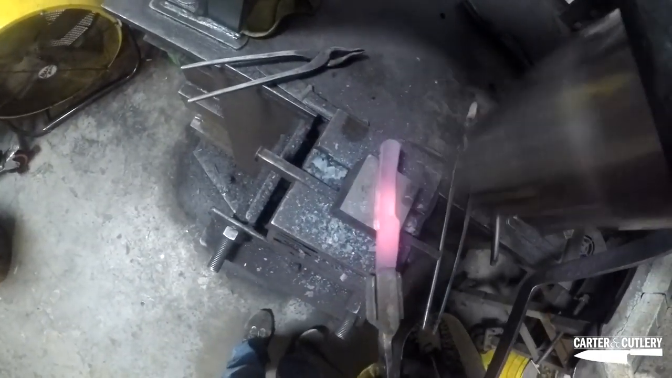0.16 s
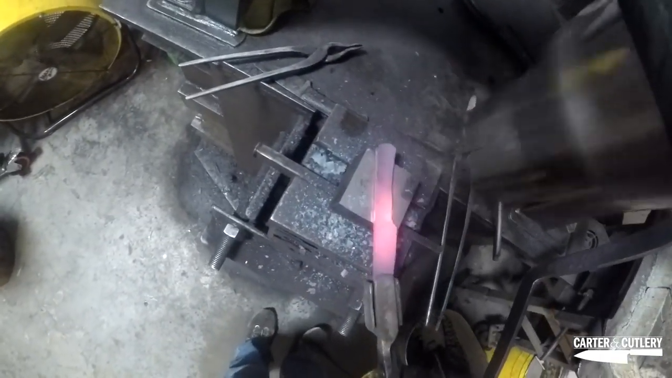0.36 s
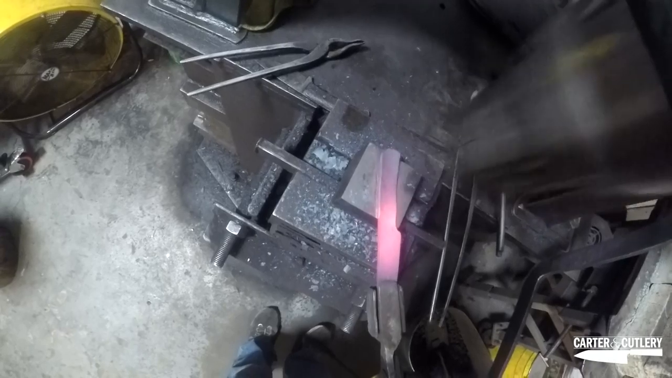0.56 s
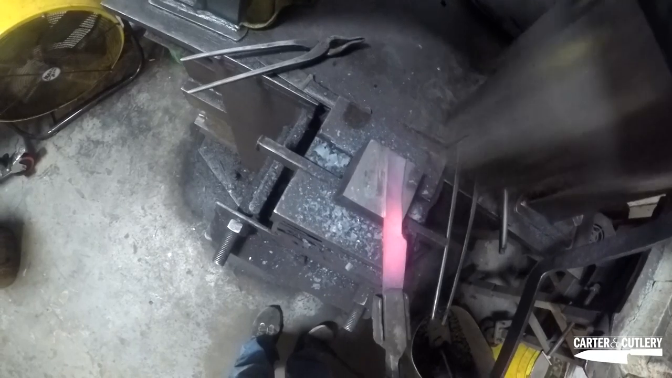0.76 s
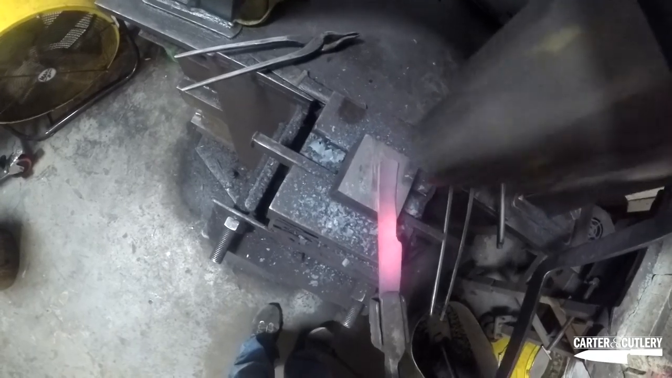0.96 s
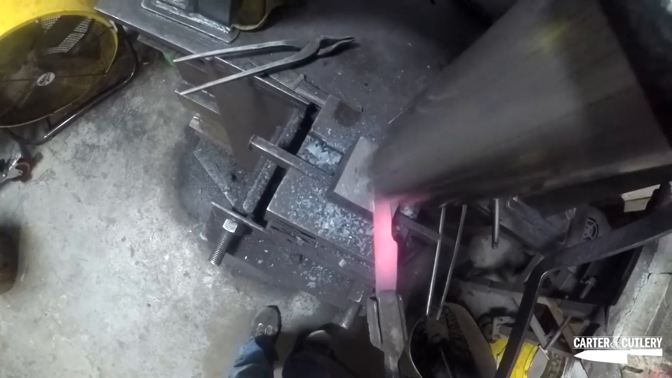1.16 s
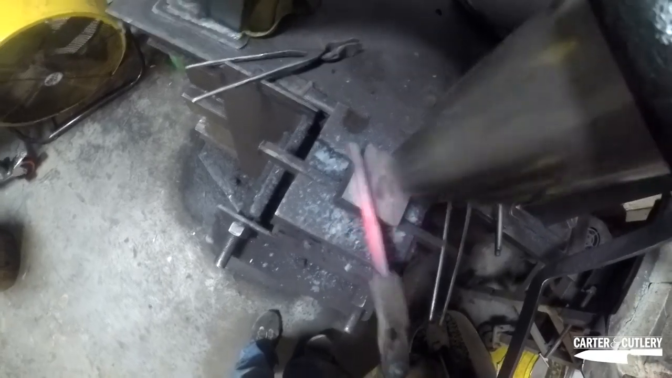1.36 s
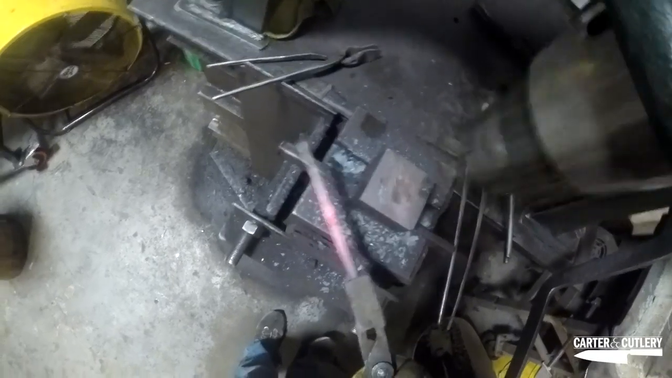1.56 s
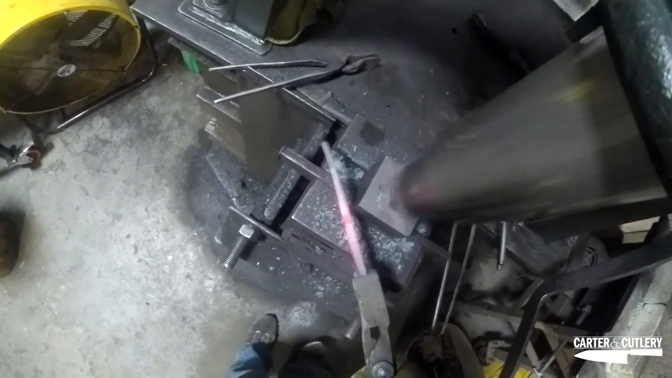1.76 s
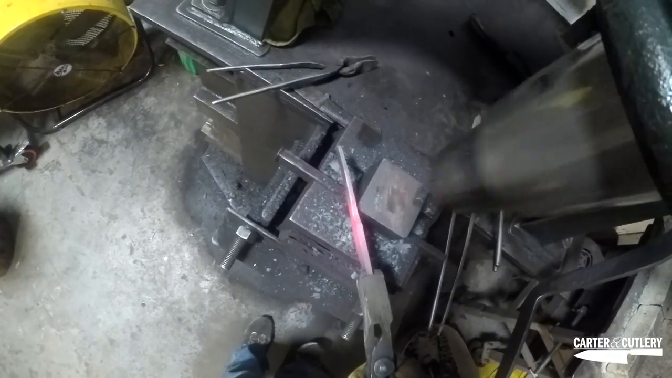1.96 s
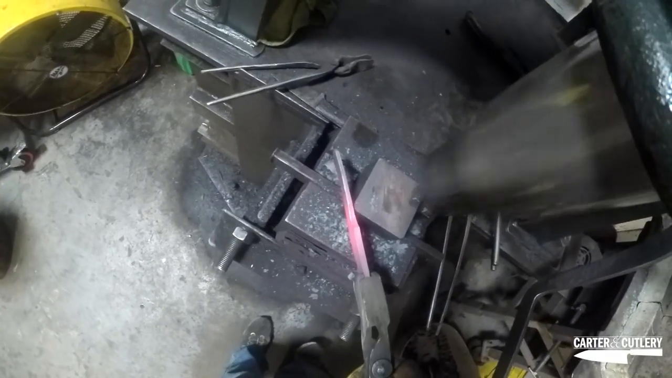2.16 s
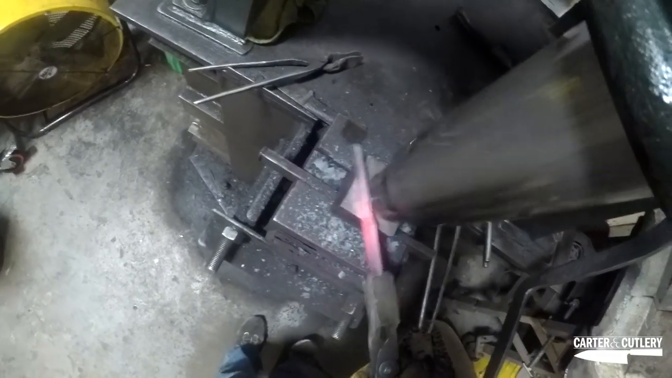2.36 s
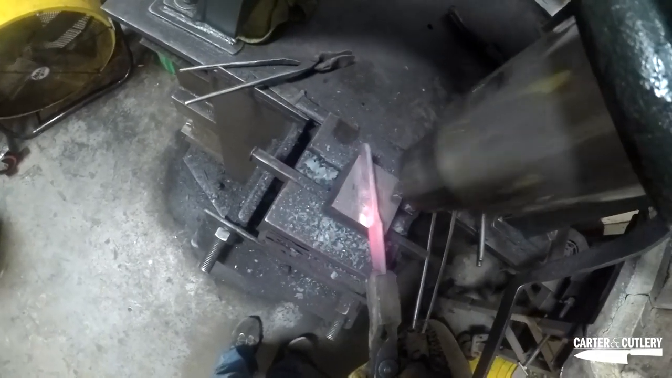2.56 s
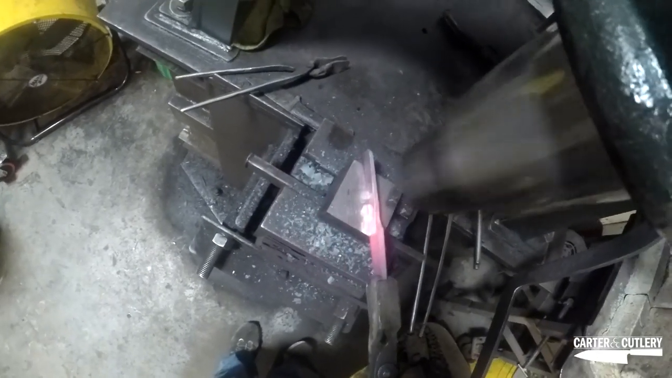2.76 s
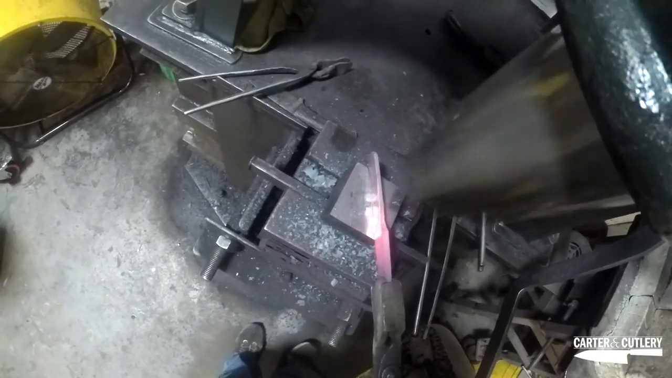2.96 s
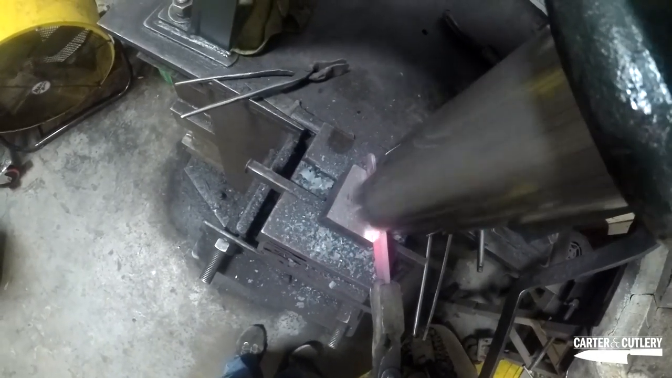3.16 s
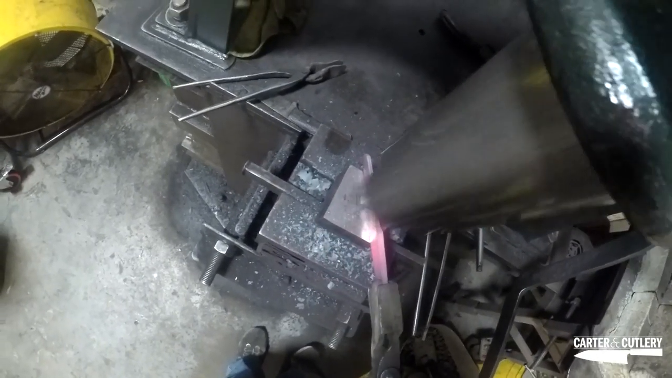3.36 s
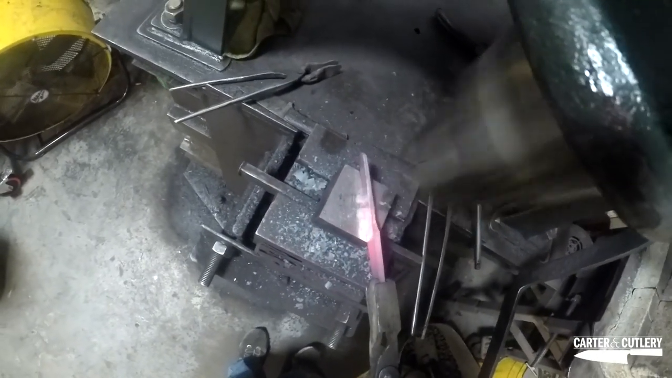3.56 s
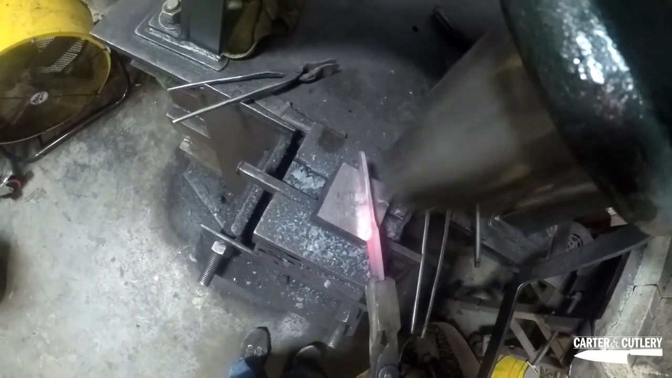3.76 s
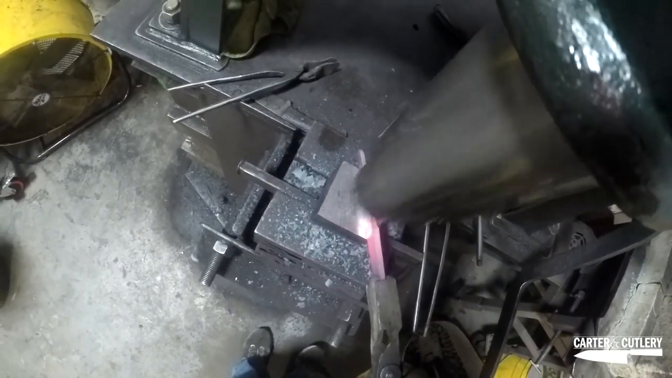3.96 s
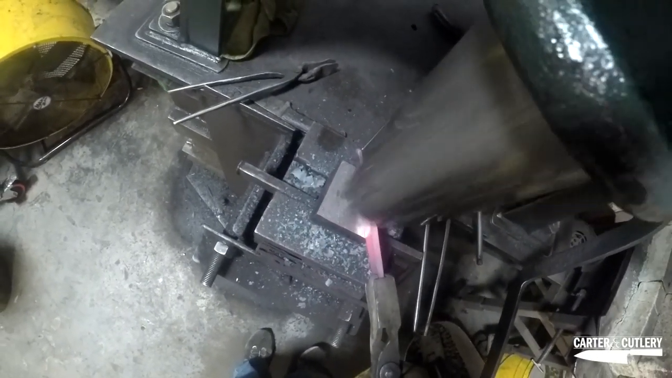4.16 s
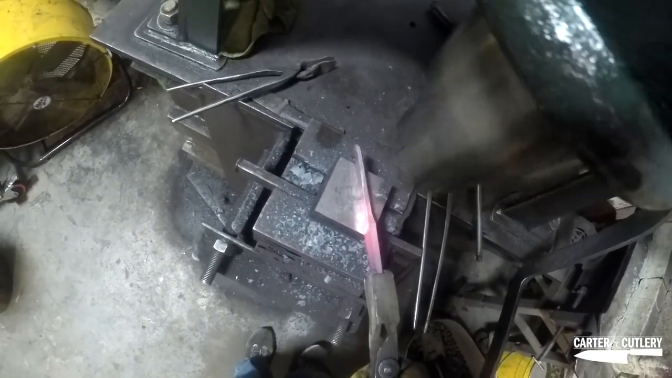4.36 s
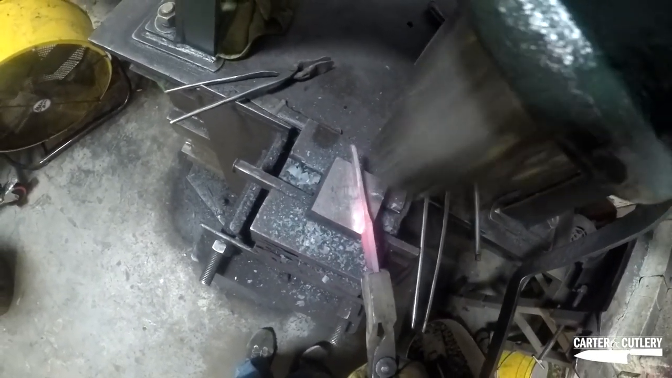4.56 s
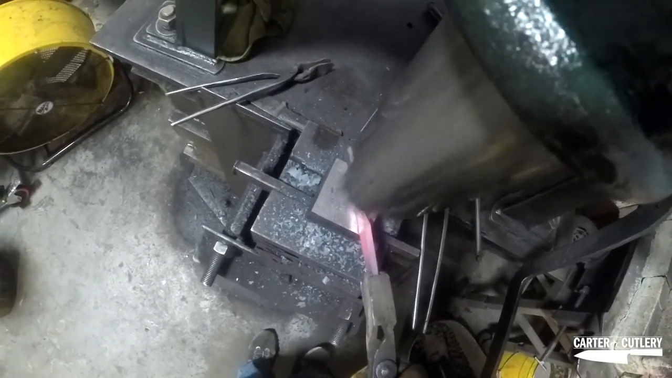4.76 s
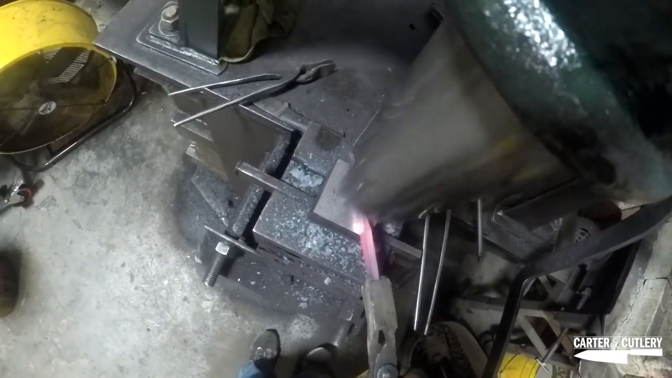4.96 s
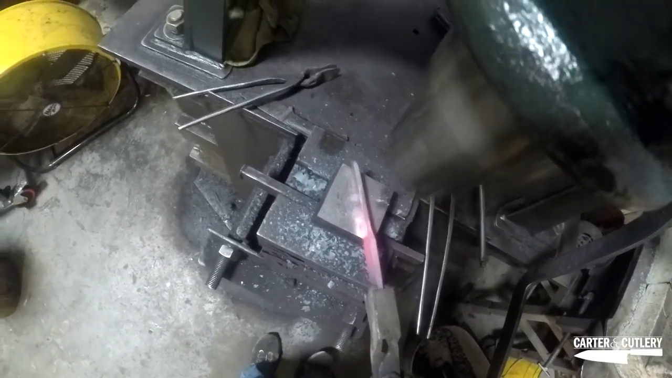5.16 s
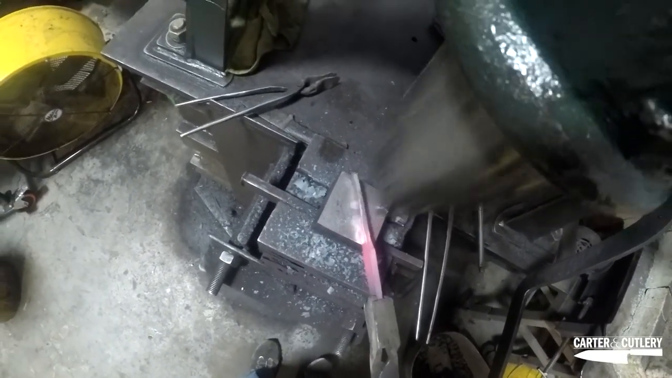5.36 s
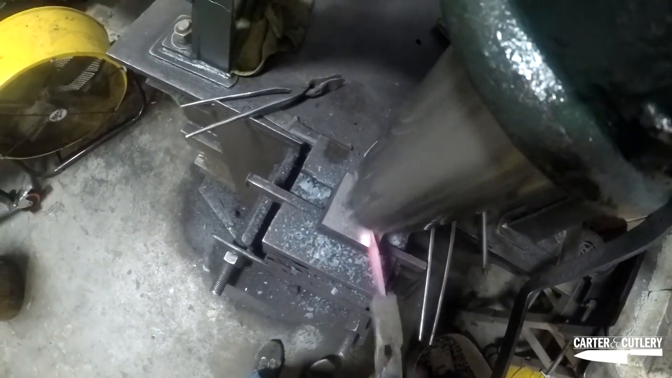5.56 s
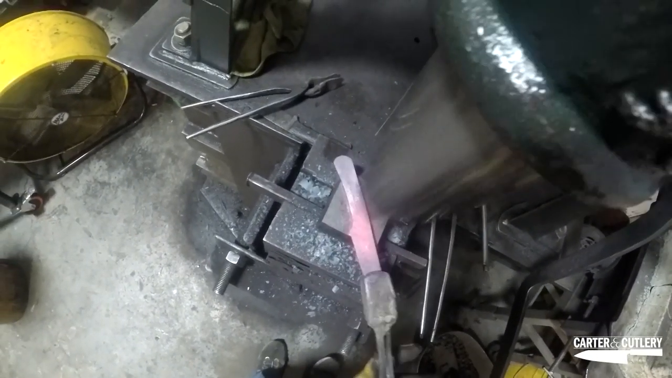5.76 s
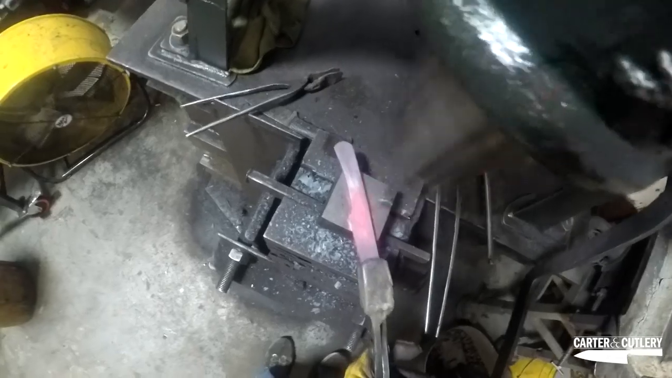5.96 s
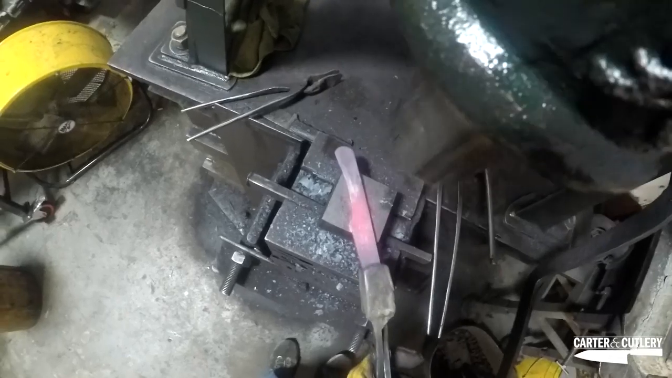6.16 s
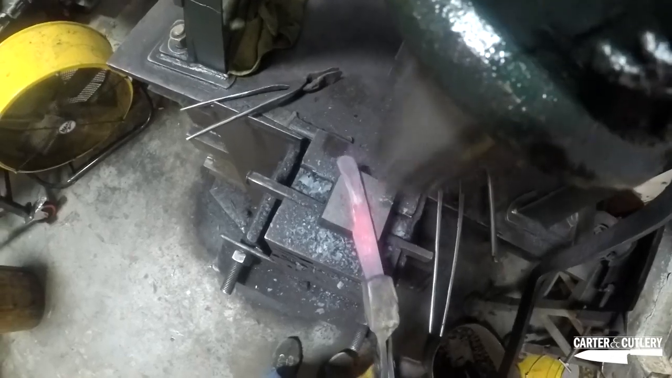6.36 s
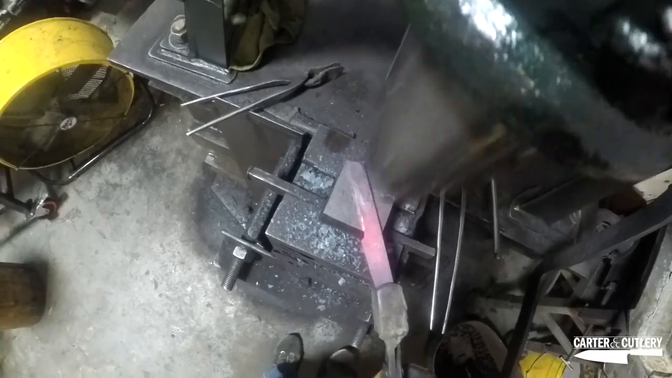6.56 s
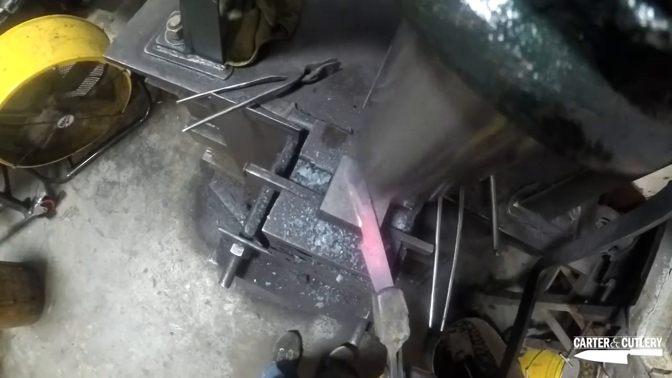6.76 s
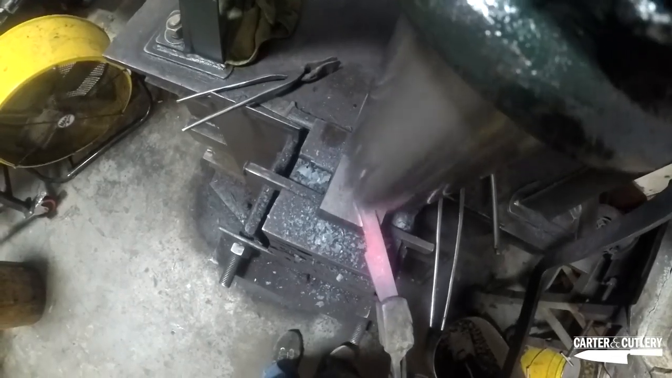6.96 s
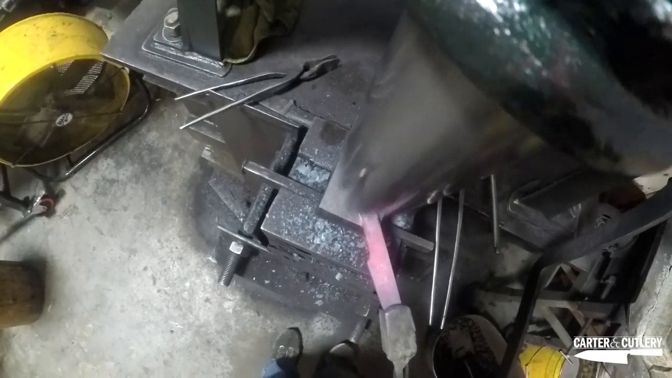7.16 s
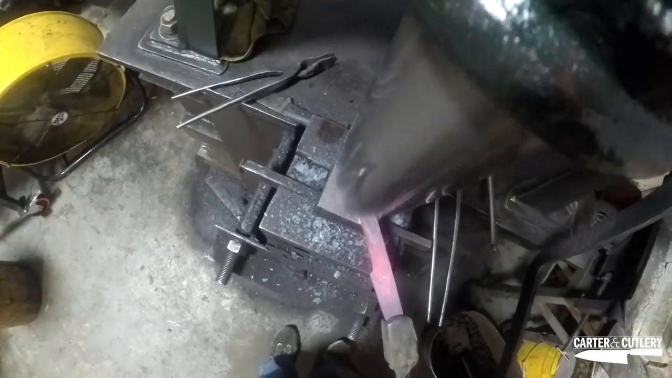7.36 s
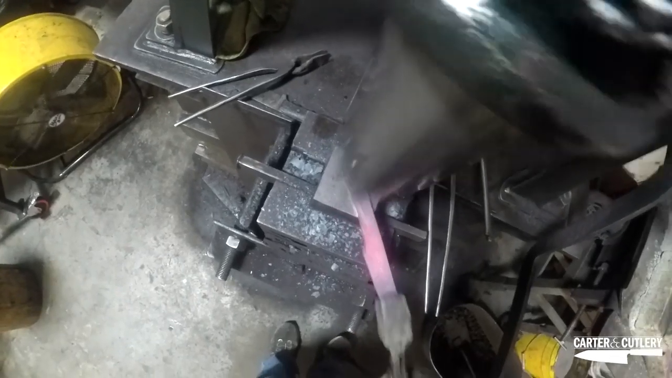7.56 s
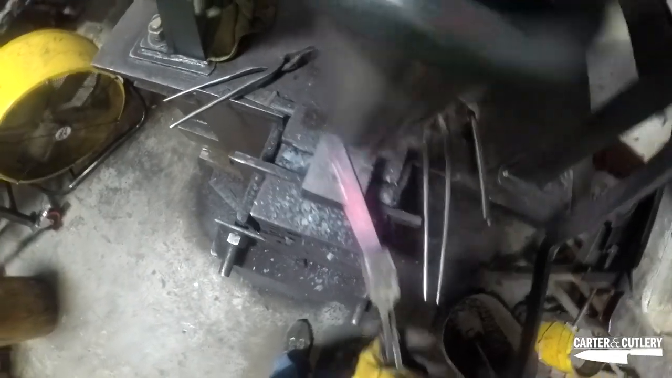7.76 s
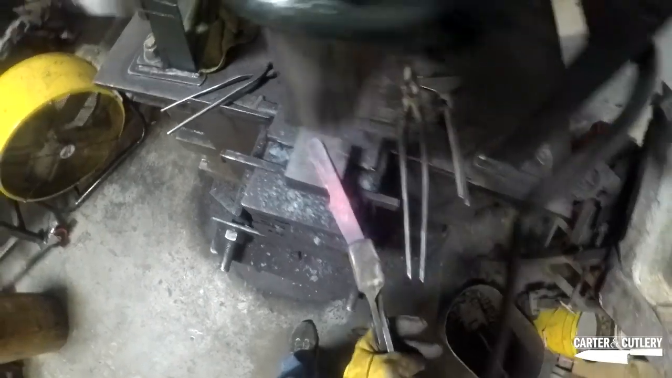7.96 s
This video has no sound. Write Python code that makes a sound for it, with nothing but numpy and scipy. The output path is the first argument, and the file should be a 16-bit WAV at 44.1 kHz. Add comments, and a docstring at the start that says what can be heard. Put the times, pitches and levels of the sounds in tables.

```python
"""A power hammer draws out a bar of hot steel in three runs of blows, about four a second, over a rumbling drive.
At each blow the linkage clacks first, then the dies crack, the frame clangs, the floor booms and the bar hops.
The first run is on the flat. In the pause the tongs squeak and the bar clinks as it is turned on edge.
The second run is on edge; after more clinks the third is on the flat, and a squeak and light clinks follow it.
Impacts are noise bursts and dying sines; the drive is steady noise. The microphone flattens the hardest peaks."""
import sys
import numpy as np
from scipy import signal
from scipy.fft import rfft, irfft, next_fast_len
from scipy.io import wavfile
from scipy.ndimage import uniform_filter1d

SR = 44100
rng = np.random.default_rng(int(sys.argv[2]) if len(sys.argv) > 2 else 0)


def store_wav(level_fs):
    """Save 16-bit WAV to argv[1]."""
    pcm = np.round(np.clip(np.atleast_2d(level_fs), -1, 1) * 32767)
    wavfile.write(sys.argv[1], SR, pcm.T.astype(np.int16))


N = 357057  # length of the scene in samples

# hammer blows: (time [s], strength [dB], pitch of bar and tongs [Hz], ring of the die [dB])
HAMMER_BLOWS = [(-0.142, 0, 3310, -14), (0.076, 2, 3310, -25), (0.2962, 1, 3870, -26),
                (0.5133, 3, 2840, -20.5), (0.7327, 3, 3830, -44), (0.9509, 1.5, 2740, -27),
                (1.2018, -1, 4780, -46), (2.937, -14.5, 3930, -50), (3.2087, -2, 3256, -40),
                (3.4568, 1, 3260, -47), (3.7155, -1, 3300, -14.5), (3.9788, 0.5, 3356, -19),
                (4.2457, 0, 3296, -16.5), (4.5145, 0.5, 3600, -19), (4.7825, 0.5, 2880, -42),
                (5.0521, -8, 3320, -51), (5.3232, -8.5, 3680, -53), (5.5997, -5.5, 2845, -64),
                (6.1226, -3.5, 2680, -25.5), (6.33, 1, 2680, -29), (6.546, 2, 3335, -21),
                (6.7755, 0, 3253, -20.5), (6.999, -3.5, 2810, -21.5), (7.2196, -0.5, 2806, -20),
                (7.441, 0, 2853, -33), (7.665, -2.5, 2830, -42)]
# colour of crushed scale and sharp steel contact: (frequency [Hz], relative level per Hz [dB])
SIZZLE_COLOUR = [(3500, -4.5), (6000, 0.5), (8000, 1.5), (10500, 3), (12200, -3), (15000, -2), (16000, -27)]
# colour of light steel touches: (frequency [Hz], relative level per Hz [dB])
CLINK_COLOUR = [(250, -31), (600, -9), (1000, -3.5), (1450, 7.5), (2100, -2), (2800, 5.5), (3800, 1),
                (5000, -19.5), (8000, -17.5), (16000, -40)]
# how fast a crack dies, by pitch: (frequency [Hz], time to fall 60 dB [s])
CRACK_DECAY = [(400, 0.021), (1400, 0.022), (3200, 0.055), (6000, 0.042), (12000, 0.025)]
# how fast the room dies away, by pitch: (frequency [Hz], time to fall 60 dB [s])
ROOM_DECAY = [(150, 0.6), (600, 0.52), (1400, 0.54), (3400, 0.68), (7000, 0.49), (14000, 0.19)]

EDGE_START_S, EDGE_END_S = 1.5, 6.1  # between these times the bar stands on edge


def amp(db):
    """Turns decibels into a plain multiplier."""
    return 10 ** (np.asarray(db) / 20)


def evened(x):
    """Scales a signal to an rms of 1."""
    return x / np.sqrt(np.mean(x ** 2) + 1e-20)


def read(points, hz):
    """Joins points by straight lines on a log-frequency axis."""
    f, value = np.transpose(points)
    return np.interp(np.log(hz + 1), np.log(f + 1), value)


def add(mix, s, sound):
    """Mixes in a sound starting at s seconds; what falls outside the scene is cut off."""
    start = round(s * SR)
    sound = sound[max(-start, 0):]
    part = mix[max(start, 0):][:len(sound)]
    part += sound[:len(part)]


def swell(x, rise):
    """Lets a sound build up over a short time, with a time constant of rise seconds."""
    return x * (1 - np.exp(-np.arange(len(x)) / SR / rise))


def band(x, low_hz, high_hz):
    """Keeps mainly the frequencies between two limits."""
    return signal.sosfilt(signal.butter(2, [low_hz, high_hz], "band", fs=SR, output="sos"), x)


def noise(spectrum, size, ripple_db=0):
    """Noise with the given spectrum at an rms of about 1; ripple lets random groups of modes stand out."""
    hz = np.fft.rfftfreq(size, 1 / SR)
    knots = np.arange(0, SR / 2, 110)
    ripple = np.interp(hz, knots, rng.standard_normal(len(knots)))
    gain = evened(amp(read(spectrum, hz) + ripple_db * ripple))
    return irfft(rfft(rng.standard_normal(size)) * gain, size)


def burst(spectrum, decays, rise, size):
    """Countless close modes struck at once: noise whose bands die each at its own speed."""
    t, hz = np.arange(size) / SR, np.fft.rfftfreq(size, 1 / SR)
    z = rfft(noise(spectrum, size, ripple_db=2.8))
    centres, t60s = np.transpose(decays)
    total = np.zeros(size)
    for one, t60 in zip(np.eye(len(centres)), t60s):
        share = read(np.c_[centres, one], hz)  # 1 at this band's centre, 0 at the other centres
        total += irfft(z * share) * np.exp(-np.log(1000) * t / t60)
    return swell(total, rise)


def ring(modes, loose, size=32768):
    """Dying sines, a little different at each impact; loose contact (0-1) scatters their timing."""
    hz, db, t60 = np.transpose(modes)[:, :, None]
    strength, shift, lag = rng.standard_normal((len(modes), 3)).T[:, :, None]
    t = np.arange(size) / SR
    waves = np.sin(2 * np.pi * (hz * (1 + .0015 * shift) * t + loose * lag))
    dying = np.exp(-np.log(1000) * t / t60)
    return (amp(db + strength) * dying * waves).sum(0)


def shimmer(x):
    """Reflections of a ringing tone arrive in and out of step with it, so it beats unevenly."""
    pair = rng.standard_normal((2, len(x)))
    in_step, across = evened(uniform_filter1d(uniform_filter1d(pair, size=400), size=300))
    depth = swell(np.ones(len(x)), rise=.02) / 3
    tone = signal.hilbert(x, 2 * len(x))[:len(x)]
    return (tone * (1 - depth / 2 + depth * (in_step + 1j * across))).real


def level(strength_db, base_db, growth):
    """Level in dB of one part: base_db at a blow of 0 dB, plus growth for each dB of strength."""
    return base_db + growth * strength_db


def weight(s):
    """Weight behind a blow at this time, in dB."""
    # eased off with the treadle as the first and last runs end: (time [s], weight [dB])
    weight_points = [(0, -17.5), (0.75, -18), (1.2, -21.5), (2.93, -22), (3.3, -17), (5.6, -17.5),
                     (6.55, -15), (7.0, -21.5), (7.7, -22.5)]
    return np.interp(s, *np.transpose(weight_points))


def on_edge(s):
    """True while the bar stands on its narrow side, so that the dies meet less steel."""
    return EDGE_START_S <= s < EDGE_END_S


def fresh_scale(s):
    """Extra sizzle in dB: scale loosened on edge shatters just after the bar is laid flat again."""
    since = s - EDGE_END_S
    return 12.5 * np.exp(-since / 0.11) if since >= 0 else 0


def sizzle(db, tail_db):
    """Crushed scale and sharp steel contact: a spit, brighter when harder, then scattering flakes crackle."""
    hz, level_db = np.transpose(SIZZLE_COLOUR)
    tilt_db = .45 * (max(db, -27) + 14)  # per octave
    colour = np.c_[hz, level_db + tilt_db * np.log2(hz / hz[2])]
    spit = np.pad(burst(colour, CRACK_DECAY, rise=.0002, size=4096), (0, 16384 - 4096))
    flakes = evened(uniform_filter1d(rng.standard_normal(len(spit)), size=200))
    crackle = amp(2.5 * flakes) * burst(colour, ROOM_DECAY, rise=.004, size=16384)
    return amp(db) * (spit + amp(tail_db) * crackle)


def room(early_db, early_s):
    """The workshop's answer to an impact: reflections off the machine lift the start of a diffuse tail."""
    # colour of the echoing workshop: (frequency [Hz], relative level per Hz [dB])
    room_colour = [(100, -8.5), (280, -9), (430, -6), (650, -2.5), (1000, -4.5), (1350, 6), (1700, -0.5),
                   (2200, -5), (2800, -2), (3400, -2.5), (4300, -6.5), (6000, -21), (16000, -34.5)]
    tail = burst(room_colour, ROOM_DECAY, rise=0.0023, size=32768)
    return tail * (1 + amp(early_db) * np.exp(-np.arange(len(tail)) / SR / early_s))


def clink(db):
    """One light touch of steel on steel: a short noise burst with a very sharp start."""
    return amp(db) * burst(CLINK_COLOUR, [(1400, 0.034), (6000, 0.037)], rise=0.000073, size=4096)


def linkage():
    """Play in the ram guides clacks before each blow; spring arms knock on the way up and as the drive takes hold."""
    # knocks as the treadle takes up the drive: (time [s], level [dB])
    take_up = [(2.825, -33), (2.885, -28), (5.981, -17)]
    # colour of a knock: (frequency [Hz], relative level per Hz [dB])
    knock_colour = [(700, -18), (1350, 1.5), (1700, 1), (2100, -21), (2800, 0.5), (9000, -70)]
    out, knocks = np.zeros(N), list(take_up)
    for s, *_ in HAMMER_BLOWS:
        rattle = burst(CLINK_COLOUR, [(1400, 0.032), (6000, 0.021)], rise=0.0043, size=4096)
        add(out, s - 0.0135, amp(-20.5 - 7 * on_edge(s)) * rattle)
        knocks.append((s + 0.127, weight(s) - 4.5))  # about half a stroke later
    for s, db in knocks:
        add(out, s, amp(db) * burst(knock_colour, [(1400, 0.033), (3200, 0.017)], rise=0.0046, size=4096))
    return out


def blows():
    """The ram lands on the bar: a noise crack, ringing steel as dying sines, crushed scale and the room."""
    # colour of the crack: (frequency [Hz], relative level per Hz [dB])
    crack_colour = [(150, -14.5), (400, -2.5), (650, -6.5), (1000, -4.5), (1350, -3.5), (1700, 2.5),
                    (2000, 2.5), (2250, -5), (2700, 4), (3700, 1.5), (4600, -3.5), (5600, -16.5),
                    (8000, -41.5), (16000, -61.5)]
    # sheet and casting modes of the frame: (frequency [Hz], level [dB], time to fall 60 dB [s])
    frame_modes = [(1230, -27, .14), (1302, -0.5, 0.18), (1286.6, 7.5, 0.043), (1345, 5.5, 0.076),
                   (1418, 1.5, 0.13), (1617, -19, 0.1)]
    # ringing modes of the die: (frequency [Hz], level [dB], time to fall 60 dB [s])
    die_modes = [(4918, 0, .115), (5350, -15, .12), (7218, -21, .15), (11990, -20, .08)]
    # ringing modes of the ram: (frequency [Hz], level [dB], time to fall 60 dB [s])
    ram_modes = [(3250, -22, 0.27), (3322, 2.5, 0.41), (3440, -8.5, 0.81)]
    out = np.zeros(N)
    for s, strength_db, bar_hz, die_db in HAMMER_BLOWS:
        crack_db = level(strength_db, base_db=-4.5, growth=0.95)
        add(out, s, amp(crack_db) * burst(crack_colour, CRACK_DECAY, rise=0.00046, size=8192))

        # the bar rings more freely as it cools and hardens: 0.92 dB louder each second
        bar_db = level(strength_db, base_db=-11.5, growth=0.99) + 0.92 * s
        bar = ring([(bar_hz, 0, .065), (.965 * bar_hz, -6, .05)], loose=1.0, size=8192)
        add(out, s, amp(bar_db) * swell(bar, rise=0.0011))

        scale_db = level(strength_db, base_db=-14.5, growth=0.67) - 3 * on_edge(s) + fresh_scale(s)
        add(out, s, sizzle(scale_db, tail_db=-28.5))

        clang_db = level(strength_db, base_db=-21, growth=0.92) - 2 * on_edge(s)
        add(out, s, amp(clang_db) * swell(ring(frame_modes, loose=0.9), rise=0.00038))

        add(out, s, amp(die_db) * shimmer(ring(die_modes, loose=0.65)))

        # the ringing die passes some of its sound on to the ram
        ram_gain = amp(level(strength_db, base_db=-41, growth=3.8)) + amp(die_db - 12)
        add(out, s, ram_gain * shimmer(ring(ram_modes, loose=0.64)))

        room_db = level(strength_db, base_db=-25.5, growth=0.66)
        add(out, s, amp(room_db) * room(early_db=-6.5, early_s=0.028))
    return out


def thuds():
    """Heavy parts ring as low dying sines and the room booms, as loud as the weight of each blow makes them."""
    # modes of anvil block, frame and floor: (frequency [Hz], level [dB], time to fall 60 dB [s])
    thud_modes = [(33.17, -4.5, 0.58), (70.9, -11.5, 0.32), (89.7, -9.5, 0.29), (109, -18.5, 0.486),
                  (135.9, -12, 0.41), (187.1, -14, 0.24), (200.5, -5, 0.22), (270, -14, 0.099),
                  (325.7, -13.5, 0.35), (376.6, -16.5, 0.24), (402.1, -3, 0.11), (425.8, -0.5, 0.12),
                  (519, -17, 0.36), (583, -16, 0.25), (757.6, -17, 0.3), (851, -14.5, 0.27)]
    # the frame jolts at the blow, and again as ram and springs recoil:
    # (delay [s], frequency [Hz], relative level [dB])
    jolts = [(.002, 415, 3.5), (.003, 250, 2.5), (0.011, 85, -2.5), (.026, 520, -10), (0.056, 181, -2)]
    # colour of the room's boom: (frequency [Hz], relative level per Hz [dB])
    boom_colour = [(20, -14), (60, -2.5), (90, 6), (155, -1.5), (210, -1.5), (270, -10), (400, -3),
                   (520, -18), (1200, -36)]
    out = np.zeros(N)
    boom = burst(boom_colour, ROOM_DECAY, rise=0.006, size=32768)
    for s, *_ in HAMMER_BLOWS:
        thud_db = weight(s)
        body = ring(thud_modes, loose=.02)
        add(out, s + 0.00284, amp(thud_db + 0.5) * swell(body, rise=0.0039))
        add(out, s, amp(thud_db - 10.0) * boom)
        for delay, hz, db in jolts:
            jolt = swell(ring([(hz, 0, .03)], loose=0, size=4096), rise=0.0034)
            add(out, s + delay, amp(thud_db + db + 7.5) * jolt)
    return out


def slab():
    """Each blow sets the floor booming; a bar on edge gives way and cushions it."""
    # colour of the floor under the anvil: (frequency [Hz], relative level per Hz [dB])
    slab_colour = [(40, -27), (70, -2), (95, 5), (120, -11), (200, -42.5)]
    out = np.zeros(N)
    for s, *_ in HAMMER_BLOWS:
        slab_db = weight(s) - 13.5 - 10 * on_edge(s)
        add(out, s, amp(slab_db) * burst(slab_colour, [(60, 0.43), (120, 0.38)], rise=0.012, size=16384))
    return out


def rebounds():
    """The bar hops and drops back a moment after a blow; a light blow fails to pin it, so it also slaps the die."""
    hop_s, slap_s = 0.036, 0.019  # delays after the blow
    light_blow_db = -4.5  # blows weaker than this let the bar slap
    out = np.zeros(N)
    for s, strength_db, *_ in HAMMER_BLOWS:
        hop_db = level(strength_db, base_db=-21.5, growth=0.99) + rng.uniform(-3, 3)
        add(out, s + hop_s, clink(hop_db))
        add(out, s + hop_s, amp(hop_db - 20.5) * burst(SIZZLE_COLOUR, CRACK_DECAY, rise=.0005, size=4096))
        if strength_db < light_blow_db:
            add(out, s + slap_s, clink(level(strength_db, base_db=-9, growth=1)))
    return out


def drive():
    """Motor, belt and flywheel as noise: a lumpy rumble, a fluttering whirr, and faint resonances of the frame."""
    # loudness of the rumble over time: (time [s], level [dB])
    rumble_levels = [(0, -42), (1.25, -39), (1.48, -32), (1.7, -38), (2.8, -42), (3.2, -34.5), (5.4, -41.5),
                     (6.1, -30.5), (7.6, -40), (7.9, -41.5)]
    # colour of the rumble: (frequency [Hz], relative level per Hz [dB])
    rumble_colour = [(10, 12), (22, 4), (36, 12.5), (58, -9), (105, -6), (155, -15), (205, -13.5),
                     (300, -34), (800, -54), (2000, -109)]
    # colour of the whirr: (frequency [Hz], relative level per Hz [dB])
    whirr_colour = [(100, -24), (260, 1), (500, -6), (1000, -7), (1450, -2), (2000, -5), (3400, 0),
                    (4500, -8), (6000, -14.5), (10000, -19.5), (15500, -33.5)]
    t, size = np.arange(N) / SR, next_fast_len(N)
    rumble_gain = amp(np.interp(t, *np.transpose(rumble_levels)))
    rumble = rumble_gain * noise(rumble_colour, size)[:N]
    # a slow wobble in level, mostly around 12 Hz
    flutter = amp(0.77 * noise([(1, -66), (12, 14), (60, -22), (300, -100)], size)[:N])
    hiss = amp(-1.5) * noise(whirr_colour, size)[:N]
    hum = np.zeros(N)
    # resonances: centre Hz, width Hz, relative dB
    for hz, width, db in [(200.6, 23.8, -11.5), (5350, 87, -18), (1449, 30.6, -11.5), (3564, 750, -12.5)]:
        hum += amp(db) * evened(band(rng.standard_normal(N), hz - width / 2, hz + width / 2))
    return rumble + amp(-49.5) * (flutter * hiss + hum)


def squeaks():
    """Steel slipping in the tongs sings briefly; its tones waver, catch unevenly and linger in the room."""
    # when the steel slips: (time [s], length [s], level [dB])
    slips = [(1.316, 0.062, -38.5), (7.831, 0.11, -56)]
    # tones of the squeak: (frequency [Hz], relative level [dB])
    squeak_tones = [(2740, 1), (2950, -20), (4000, 1.5), (6067, -13), (6260, -9), (6783, -9), (7181, -8),
                    (8317, -11), (9448, -7.5), (10029, -11), (11353, -24), (12344, -17), (13975, -24)]
    out = np.zeros(N)
    for s, length, db in slips:
        t = np.arange(round(length * SR)) / SR
        rise_and_fall = np.sin(np.pi * t / length) ** 1.2
        for hz, tone_db in squeak_tones:
            waver, grip = evened(uniform_filter1d(rng.standard_normal((2, len(t))), size=400))
            phase = 2 * np.pi * hz * np.cumsum(1 + .004 * waver) / SR
            tone = np.sin(phase) * amp(3 * grip)
            add(out, s, amp(db + tone_db) * tone * rise_and_fall)
    tail = burst(SIZZLE_COLOUR, ROOM_DECAY, rise=.004, size=16384)
    echo = signal.oaconvolve(out, tail / np.linalg.norm(tail))[:N]
    return out + amp(-19) * echo


def clinks():
    """Bar and tongs touch the die as they are turned and shifted: short, light bursts with a little room."""
    # light touches: (time [s], level [dB], sizzle level [dB])
    touches = [(1.5602, -17.5, -29), (1.728, -36, -56), (1.923, -19, -36), (2.1057, -31.5, -62),
               (2.411, -45, -48), (2.476, -30.5, -58), (3.005, -31.5, -57), (5.8915, -28, -23.5),
               (5.9035, -26.5, -38), (5.9565, -25, -42), (5.9989, -27, -56), (6.2285, -21, -43),
               (7.93, -52, -37.5), (7.986, -33.5, -44)]
    out = np.zeros(N)
    for s, db, sizzle_db in touches:
        add(out, s, clink(db))
        add(out, s, sizzle(sizzle_db, tail_db=-26))
        add(out, s, amp(db - 24) * room(early_db=6.5, early_s=0.01))
    return out


def scene():
    """Everything added up as it reaches the microphone above the anvil."""
    hammer = linkage() + blows() + thuds() + slab() + rebounds()
    return (hammer + drive() + squeaks() + clinks())[None]


def record(dry):
    """The microphone weakens the deepest bass, flattens the hardest peaks at a firm knee, then cuts the top."""
    x = signal.sosfilt(signal.butter(1, 12, "high", fs=SR, output="sos"), dry)
    clipped = x / (1 + x ** 6) ** (1 / 6)
    top_cut = signal.firwin(255, 15800, window=("kaiser", 9), fs=SR)  # low-pass at 15800 Hz
    return signal.oaconvolve(clipped, top_cut[None], "same")


dry = scene()
out = record(dry)
store_wav(out)
```